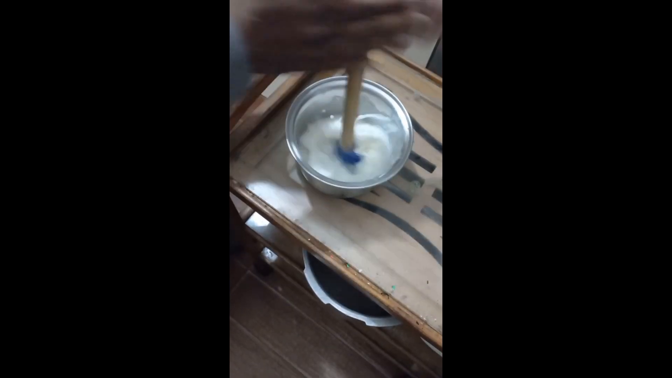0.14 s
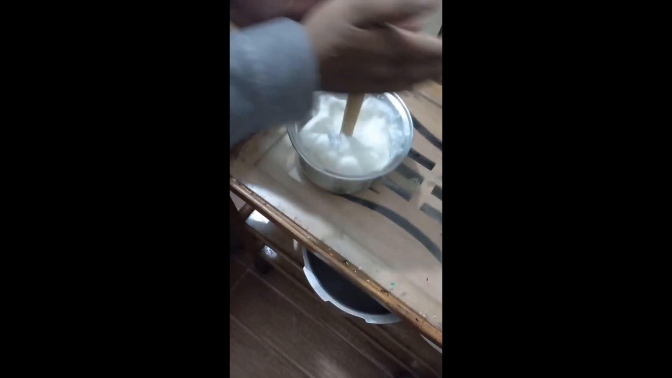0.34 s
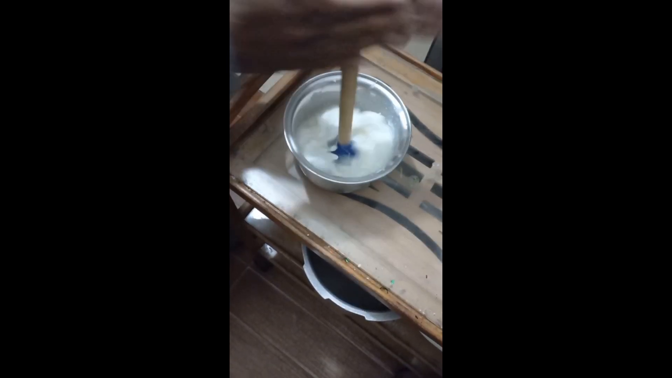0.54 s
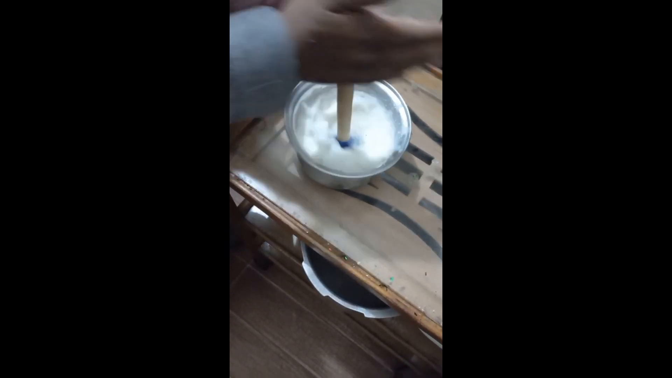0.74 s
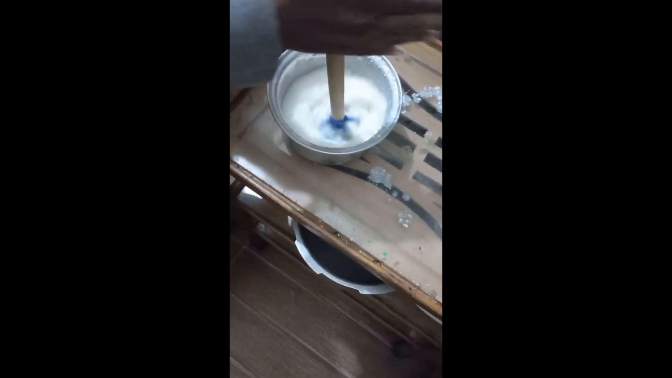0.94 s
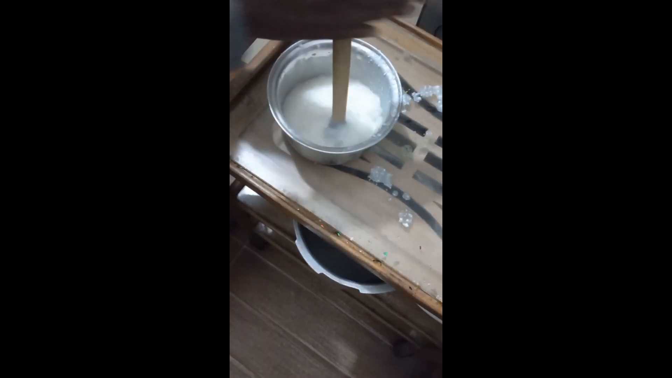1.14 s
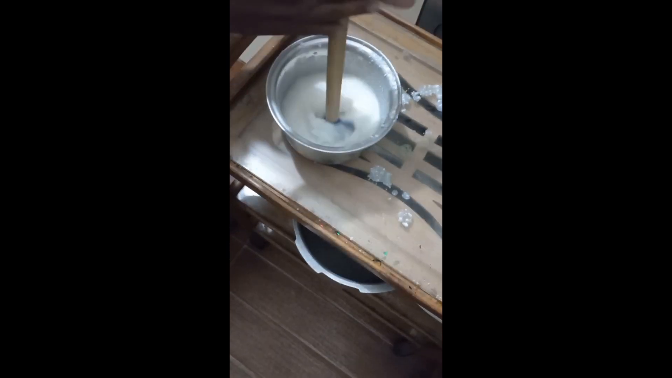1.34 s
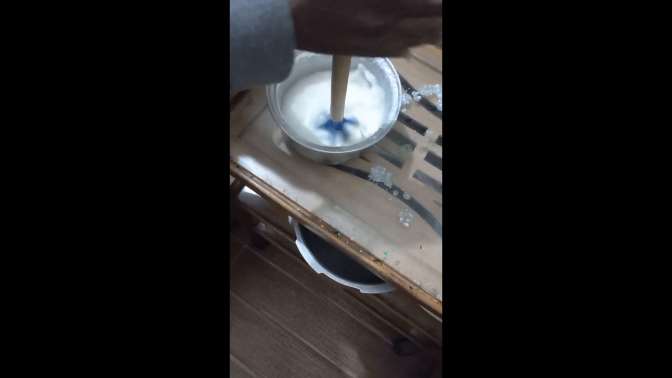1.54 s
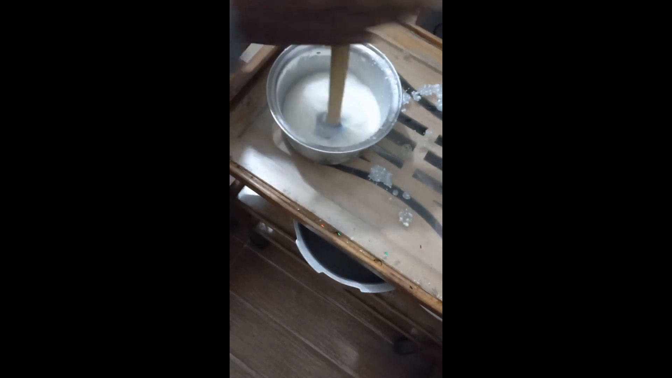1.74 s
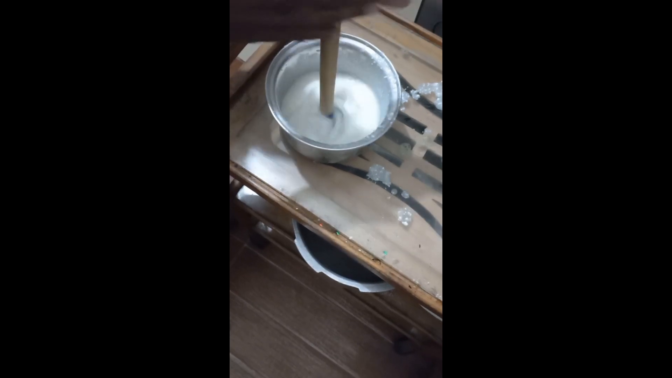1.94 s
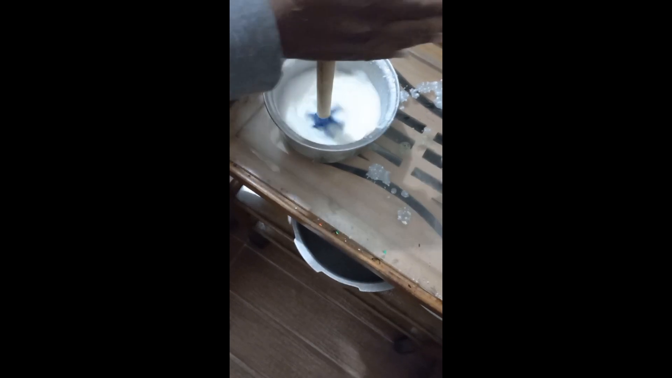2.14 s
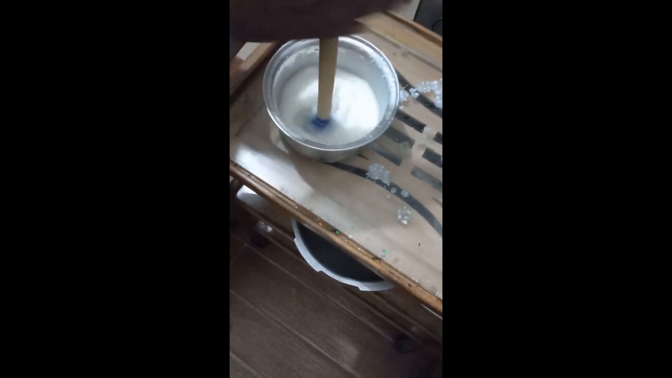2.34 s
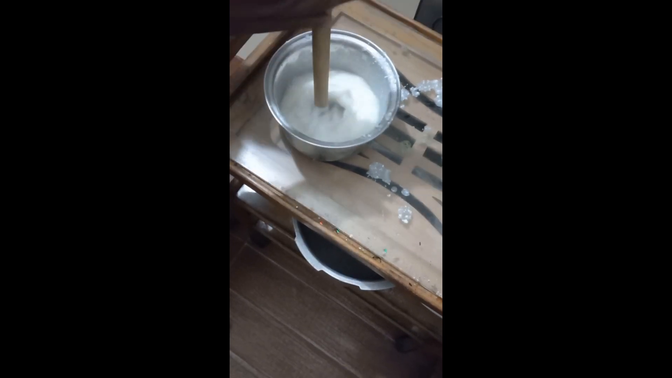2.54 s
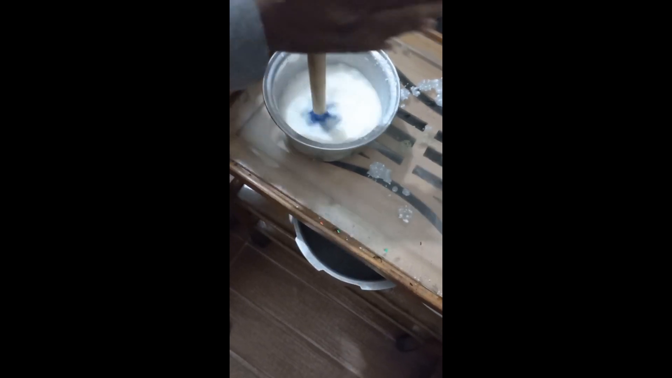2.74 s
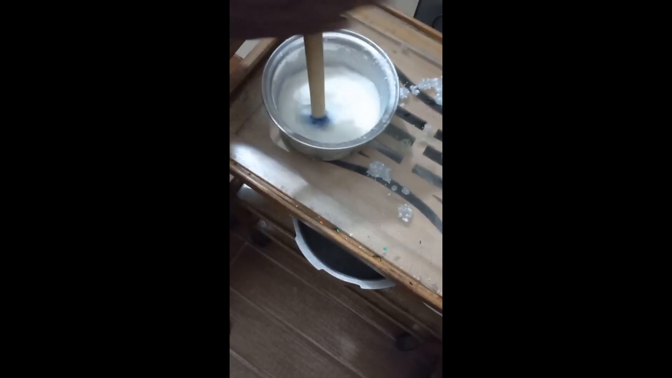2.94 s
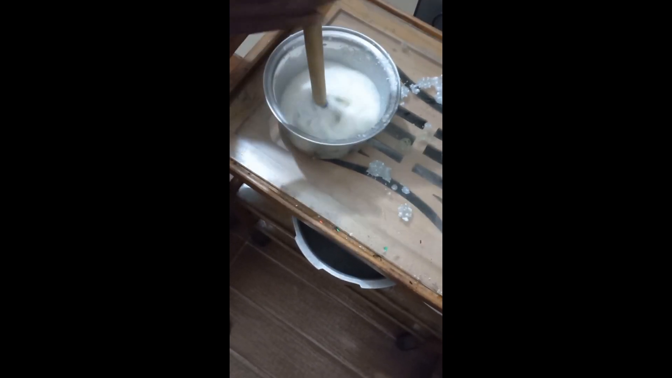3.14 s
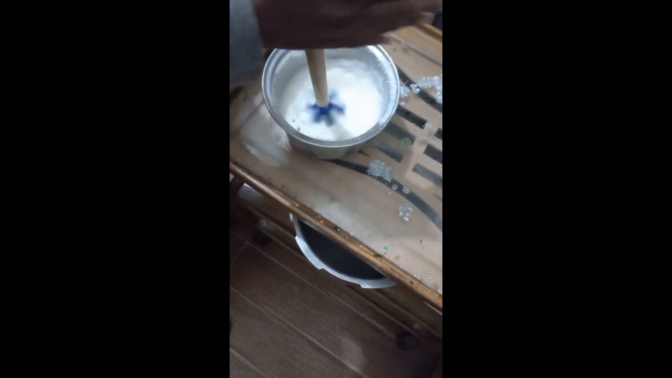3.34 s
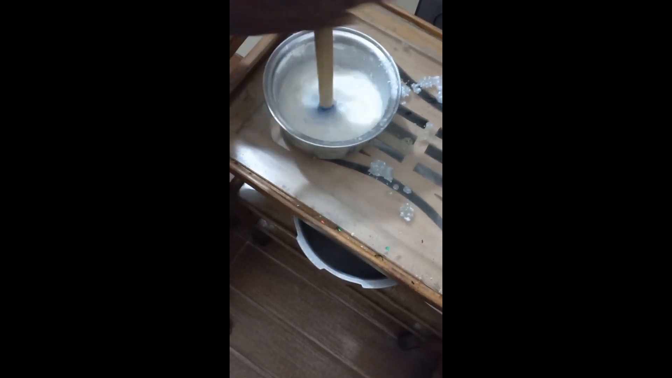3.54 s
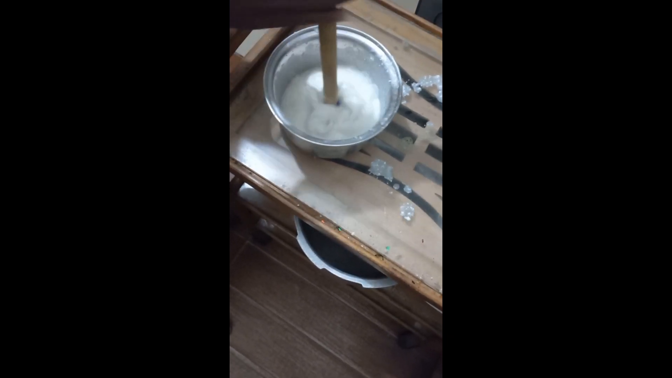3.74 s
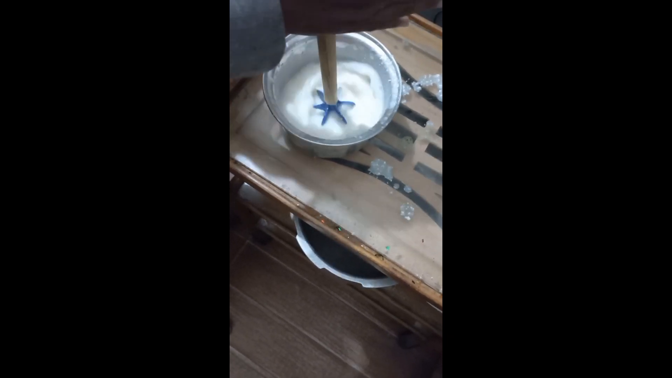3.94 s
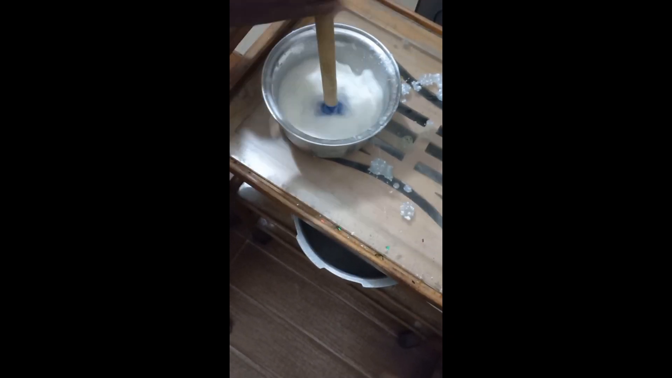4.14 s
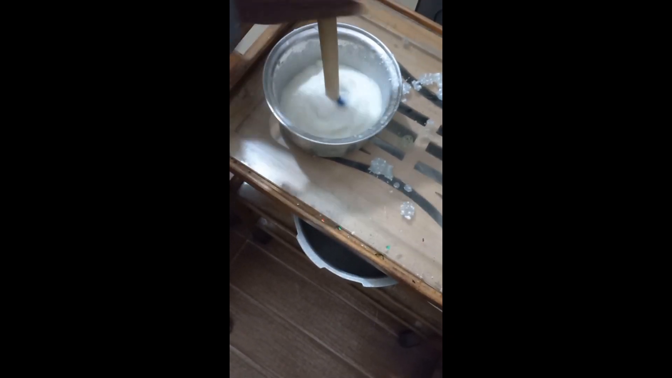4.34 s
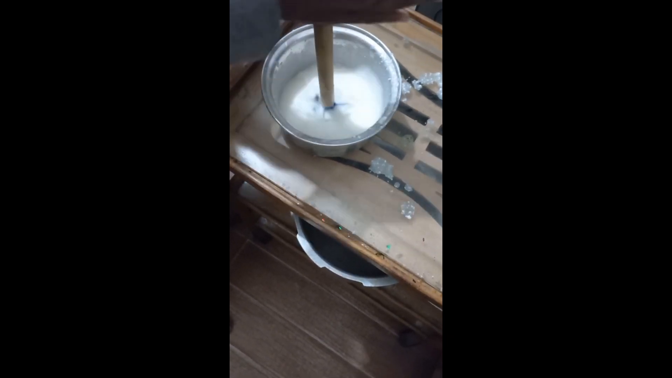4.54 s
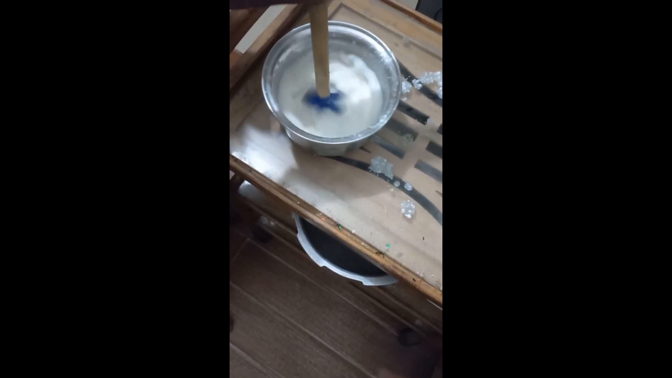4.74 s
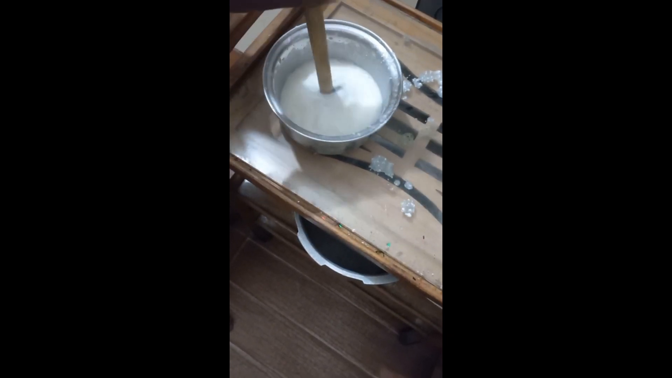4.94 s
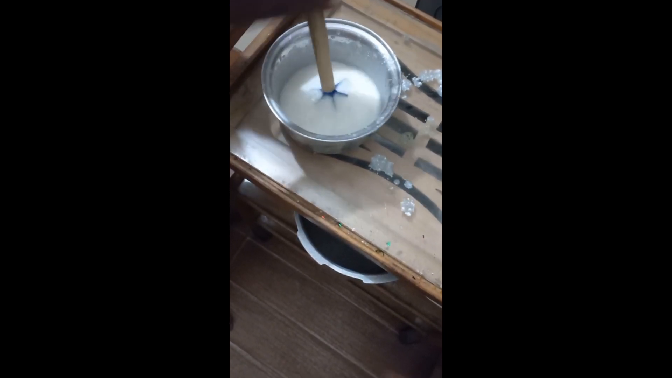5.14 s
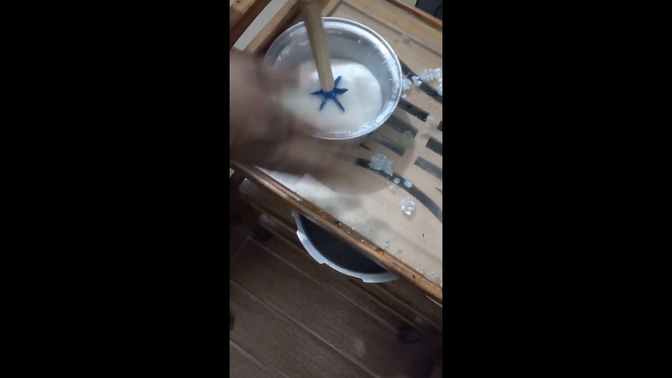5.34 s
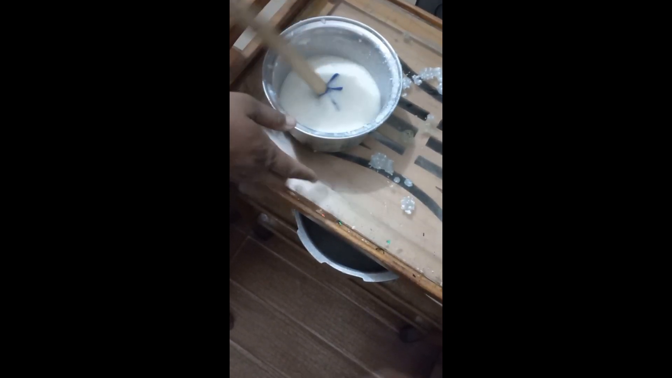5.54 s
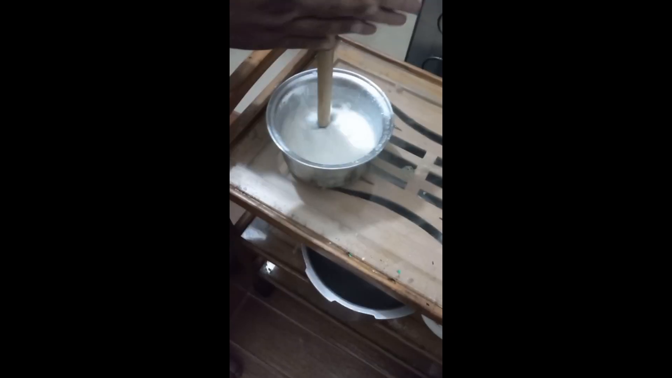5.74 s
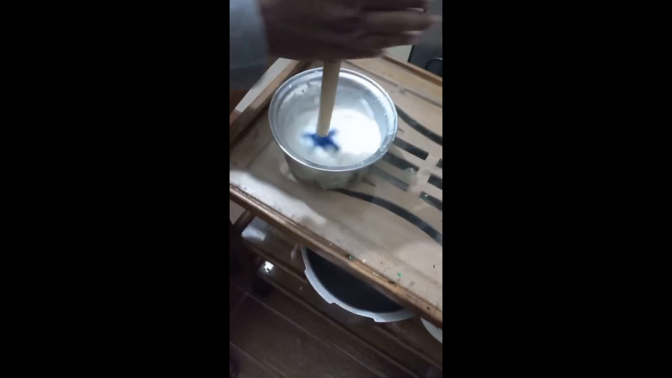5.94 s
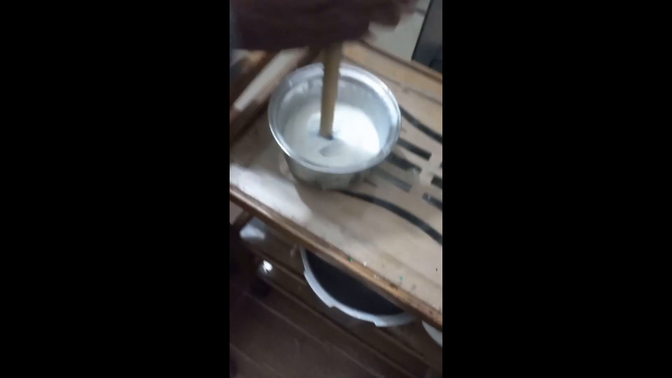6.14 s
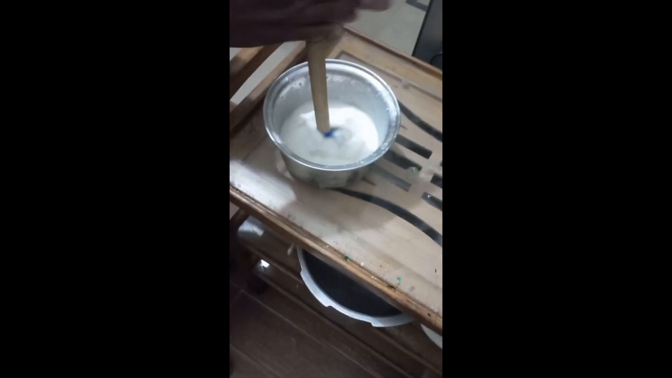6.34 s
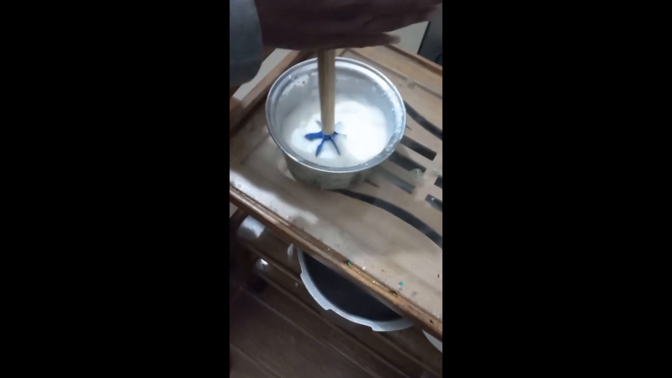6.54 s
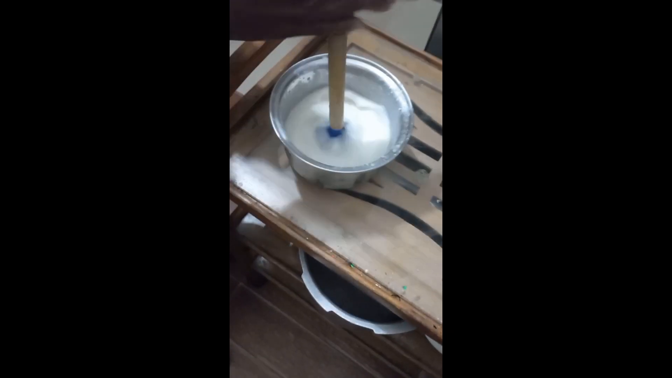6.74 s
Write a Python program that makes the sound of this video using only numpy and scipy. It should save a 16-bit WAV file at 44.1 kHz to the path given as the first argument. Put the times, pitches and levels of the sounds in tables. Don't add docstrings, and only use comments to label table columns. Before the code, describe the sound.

Wet churning in a metal pot: quick strokes of gurgle, splash and froth, a short rest with a skin squeak, then softer splashing.

```python
import sys
import numpy as np
from scipy import signal
from scipy.fft import rfft, irfft, next_fast_len
from scipy.io import wavfile
from scipy.ndimage import uniform_filter1d

SR = 44100
rng = np.random.default_rng(int(sys.argv[2]) if len(sys.argv) > 2 else 0)


def volts_from_db(level):
    exponent = np.asarray(level, float) / 20
    return 10 ** exponent


def store_pcm(level_fs):
    pcm = np.round(np.clip(level_fs, -1, 1) * 32767).astype(np.int16)
    wavfile.write(sys.argv[1], SR, np.atleast_2d(pcm).T)


N = 303849
FAST = next_fast_len(N)


def evened(x):
    return x / np.sqrt(np.mean(x ** 2) + 1e-20)


def smooth(x, size):
    return uniform_filter1d(uniform_filter1d(x, size), size)


def steadied(x):
    return x / np.sqrt(abs(uniform_filter1d((x ** 2).mean(0), size=5000)) + 1e-12)


def read(points, hz, column=1):
    rows = np.transpose(points)
    return np.interp(np.log(hz + 1), np.log(rows[0] + 1), rows[column])


def through(x, response):
    return irfft(rfft(x, FAST) * response(np.fft.rfftfreq(FAST, 1 / SR)), FAST)[..., :N]


def colour(x, points):
    return through(x, lambda hz: volts_from_db(read(points, hz)))


def ring(x, modes):
    return sum(volts_from_db(db) * signal.lfilter(*signal.iirpeak(hz, hz / width, SR), x) for hz, width, db in modes)


RIGHT_LAG_S = 7.5 / SR


def ports(x, share=1):
    return np.array([x, through(x, lambda hz: np.exp(-2j * np.pi * hz * share * RIGHT_LAG_S))])


# hz, level_db_per_hz
AIR = [(18, -76.5), (30, -38), (86, -36.5), (106, -20.5), (127, -19), (149, -19), (252, -11), (384, -50.5),
       (473, -40), (632, -46.5), (721, -57), (1500, -39), (2900, -42), (5450, -33), (16000, -48)]
AIR_DB = -75


def floor():
    air = np.array([colour(v, AIR) for v in rng.standard_normal((2, N))])
    high = signal.sosfilt(signal.butter(4, 600, "high", fs=SR, output="sos"), air)
    return air / np.sqrt(np.mean(high ** 2)) * volts_from_db(AIR_DB)


# hz, level_db, t60_s
ROOM = [(100, -30.5, 0.2), (302, -13, 0.53), (980, 1.5, 0.25), (3900, 1, 0.088), (14000, -1, 0.024)]


def kitchen(x, count=4):
    length = SR // 3
    taps = np.zeros((count, 2, length))
    slots = np.arange(40, length - 20, 20)
    at = slots + rng.integers(0, 20, (count, 2, len(slots)))
    np.put_along_axis(taps, at, rng.choice([-1., 1.], at.shape), 2)
    taps *= 1 - np.exp(-np.arange(length) / SR / 0.0079)
    hz, t, z = signal.stft(taps, SR, nperseg=512)
    t60_s = np.maximum(read(ROOM, hz, column=2), .02)[:, None]
    decay = volts_from_db(read(ROOM, hz)[:, None] - 60 * t / t60_s) / np.sqrt(t60_s)
    tails = signal.istft(z * decay, SR, nperseg=512)[1]
    energy = SR / 20 / (6 * np.log(10))
    turn = np.arange(N) / SR / .04 - np.arange(count)[:, None]
    share = np.cos(np.pi / 2 * np.clip((turn + count / 2) % count - count / 2, -1, 1))
    size = next_fast_len(N + tails.shape[-1])
    wet = rfft(x * share, size)[:, None] * rfft(tails / np.sqrt(energy), size)
    return irfft(wet.sum(0), size)[:, :N]


def board(modes, span):
    hum = ring(ring(rng.standard_normal(N), modes), span)
    return hum / np.sqrt(abs(smooth(hum ** 2, 3600)) + 1e-12)


# centre_s, low_board_db, upper_board_db, spread_s
PRESSES = [(.04, -45, -36, 0.11), (.2, -38.5, -57, 0.095), (.42, -32.5, -33, 0.091),
           (.62, -44, -41.5, 0.17), (1.09, -41, -38, 0.24), (1.61, -38, -37.5, 0.17),
           (1.84, -48, -39, 0.075), (2.17, -44, -44, 0.12), (2.4, -45.5, -39, 0.14),
           (2.8, -48, -43.5, 0.37), (3.28, -49.5, -45, 0.21), (3.53, -47, -36.5, 0.056),
           (3.8, -42, -38.5, 0.099), (4.17, -42.5, -35.5, 0.058), (4.47, -43, -43, 0.23),
           (4.78, -38.5, -39, 0.068), (5.08, -41, -40, 0.071), (5.32, -49, -53, 0.18),
           (5.723, -38, -36, 0.061), (5.92, -48, -41, 0.067), (6.2, -48.5, -47, 0.072),
           (6.54, -51, -48, 0.11), (6.81, -54, -50, 0.064)]
EASE_DB = 7


def pressure(column):
    t = np.arange(0, N / SR + .01, .005)
    rows = np.transpose(PRESSES)[..., None]
    power = volts_from_db(rows[column] - EASE_DB * abs((t - rows[0]) / rows[3]) ** 1.37) ** 2
    return np.interp(np.arange(N) / SR, t, np.sqrt(power.sum(0)))


# hz, width_hz, gain_db
LOW_BOARD = [(122.95, 2.65, 8), (143, 12.5, -1), (175, 26, -8.5), (78, 25, -12)]
UPPER_BOARD = [(247, 10, 8), (231.3, 2.1, -4.5), (272.6, 9.5, 0), (292.4, 5.6, -1.5), (403, 15, -6.5),
               (530, 7.7, 5.5)]


def table():
    low = board(LOW_BOARD, [(135, 107, 0)]) * pressure(column=1)
    upper = board(UPPER_BOARD, [(247, 90, 0)]) * pressure(column=2)
    return ports(low + upper)


# start_s, peak_db, pitch_hz, length_s
RINGS = [(0.171, -27.5, 541, 0.03), (0.356, -34, 3070, 0.025), (1.26, -34, 908, 0.041),
         (2.041, -27.5, 966, 0.038), (2.403, -28.5, 700, 0.024), (2.74, -35.5, 770, 0.035),
         (2.778, -46, 717, 0.037), (4.995, -53, 3380, .06), (5.139, -49.5, 530, 0.03),
         (5.81, -32.5, 700, 0.013), (6.36, -52, 694, .04), (6.401, -40.5, 700, 0.028)]


def rings():
    t, tone = np.arange(N) / SR, np.zeros(N)
    for s, db, hz, length in RINGS:
        since = t - s
        level_db = db - 156 * since.clip(0, 1) - 380 * (since - length).clip(0, 1)
        tone += volts_from_db(level_db) * (since / 0.0013).clip(0, 1) * np.sin(2 * np.pi * hz * since)
    return ports(tone, share=0.57)


def bubble(hz, t60, glide, chance):
    t = np.arange(int(t60 * SR) + 20) / SR
    tone = np.sin(2 * np.pi * (hz * t * (1 + glide * t / t60) + chance))
    return tone * volts_from_db(-60 * t / t60) * (1 - np.exp(-t * hz * 1.44))


def pops(rows, ring_s, glide, tick, spray=0.):
    out, chance = np.zeros((2, N + SR)), rng.random((len(rows), 3))
    noise, t = rng.standard_normal((len(rows), 1500)), np.arange(1500) / SR
    for (s, db, hz), (phase, rise, spot), crack in zip(rows, chance, noise):
        tone = bubble(hz, ring_s * (1000 / hz) ** 0.72, glide * rise, phase)
        mist = ring(crack, [(0.97 * min(hz, 12000), 0.36 * hz, 0)]) * np.exp(-t / 0.0044)
        puff = tick * crack * np.exp(-t / 0.00019) + spray * mist
        for port, lag in zip(out, (0, RIGHT_LAG_S + (spot - 1.2) * 5 / SR)):
            at = round((s + lag) * SR)
            port[at:at + len(tone)] += volts_from_db(db) * tone
            port[at:at + len(puff)] += volts_from_db(db) * puff
    return out[:, :N]


# start_s, peak_db, pitch_hz
THUMPS = [(1.455, -35, 366.6), (4.085, -31, 342), (4.342, -36.5, 334), (4.72, -34.5, 321),
          (4.95, -33.5, 247), (5.12, -33.5, 247), (5.7, -26, 243.2), (5.705, -36, 135)]


def thumps():
    return pops(THUMPS, 0.16, glide=0, tick=0)


# start_s, peak_db, pitch_hz
SQUEAK = [
    (4.993, -30.5, 3430),
    (5.072, -44, 3200),
    (5.1, -53, 3600),
]


def squeak():
    return pops(SQUEAK, 0.062, glide=.01, tick=.05)


# start_s, peak_db, centre_hz
TICKS = [(0.0932, -26, 14000), (0.167, -13, 13300), (0.2713, -27, 10900), (0.2838, -18, 13200),
         (0.4763, -32, 12200), (0.4873, -20, 10200), (0.5836, -26, 12800), (0.6983, -16, 10960),
         (0.7537, -10, 14100), (0.8415, -31, 12700), (0.8839, -36, 13700), (0.9033, -22, 12850),
         (0.9822, -26, 15500), (1.1563, -37, 13000), (1.1563, -31, 7380), (1.4361, -22, 13800),
         (1.7669, -31, 7420), (1.7749, -33, 7120), (1.9674, -28, 11300), (2.4269, -22, 14200),
         (2.6509, -32, 11300), (2.6778, -28, 7000), (2.7581, -25, 12200), (3.0415, -31, 7050),
         (3.2859, -21.5, 13700), (3.5548, -38, 12400), (3.5678, -26, 12100), (3.6052, -14, 7340),
         (3.8661, -24, 8780), (3.8985, -19.5, 11900), (4.1754, -12.5, 11000), (4.371, -30, 9600),
         (4.3969, -32, 10400), (4.4513, -31.5, 13900), (4.4937, -33, 14300), (4.9302, -42, 8890),
         (5.6067, -37, 13400), (5.6241, -25, 10300), (5.689, -26, 15400), (5.7109, -32, 14800),
         (5.7877, -33, 15300), (5.8775, -35, 13400), (6.0437, -48, 7110), (6.1394, -36, 13400),
         (6.2033, -29, 15200), (6.4892, -20.5, 13500), (6.554, -28, 11600), (6.6927, -30, 7150),
         (6.7446, -25, 14800), (6.785, -28, 12300), (6.8079, -24.5, 12500)]
# start_s, peak_db
FAINT_TICKS = [(0.3844, -34), (2.5137, -47), (3.473, -34), (3.4915, -39), (3.9564, -30), (4.5042, -32),
               (4.6, -37.5), (5.9678, -42), (6.106, -46), (6.2966, -40), (6.341, -37)]


def ticks():
    rows = [*TICKS, *((s, db, 8000) for s, db in FAINT_TICKS)]
    out, t = np.zeros((2, N + SR)), np.arange(900) / SR
    high = signal.butter(3, 5000, "high", fs=SR, output="sos")
    fall = np.exp(-t / 0.0011) + 0.11 * np.exp(-t / 0.003)
    for (s, db, hz), crack in zip(rows, rng.standard_normal((len(rows), 3, 900))):
        burst = signal.sosfilt(high, (crack[0] + 0.6 * crack[1:]) * fall)
        burst = 0.34 * burst + ring(burst, [(hz, 0.2 * hz, 0)])
        for port, lag, sound in zip(out, (0, RIGHT_LAG_S), burst / abs(burst).max()):
            at = round((s + lag) * SR)
            port[at:at + 900] += volts_from_db(db) * sound
    return volts_from_db(1.5) * out[:, :N]


# start_s, peak_db, centre_hz
DROPS = [(0.1355, -16, 2780), (0.2069, -15, 3600), (1.099, -25, 3640), (1.1483, -29, 4930),
         (1.322, -23.5, 3660), (1.4356, -26.5, 4960), (1.956, -32, 4640), (2.2977, -31, 5070),
         (2.3545, -17.5, 2960), (2.612, -37, 4610), (2.9203, -23, 3460), (3.0324, -32, 5680),
         (3.683, -23, 3700), (3.8087, -23.5, 5400), (4.14, -26, 3420), (4.1754, -24, 4700),
         (4.3849, -28, 3140), (4.449, -27, 4700), (5.0327, -51, 3320), (5.6241, -28, 3720),
         (5.7882, -20.5, 3200), (6.0237, -33, 5170), (6.246, -26, 4310), (6.6722, -34, 3360),
         (0.382, -26, 4300), (0.52, -21.5, 3500), (1.2562, -24, 2700), (1.287, -30, 6300),
         (1.455, -30, 6000), (1.71, -31, 5100), (2.97, -22, 2200), (3.255, -21, 3500), (3.277, -25, 2900),
         (3.7457, -30.5, 5400), (3.82, -30, 6200), (3.888, -37, 4800), (2.378, -15, 1690),
         (2.272, -31.5, 2400), (5.604, -26, 2730)]


def drops():
    return volts_from_db(2.5) * pops(DROPS, 0.018, glide=0.04, tick=0.15, spray=0.6)


# start_s, peak_db, centre_hz
SNAPS = [(0.166, -15.5, 5320), (0.1953, -18, 3350), (0.2848, -32, 5470), (0.3536, -22.5, 3070),
         (0.4863, -24.5, 6200), (0.5826, -23.5, 4830), (0.6998, -22, 5030), (0.902, -31, 3840),
         (0.9574, -27, 5730), (1.1576, -26, 4700), (1.7732, -22, 6250), (2.086, -27, 3640),
         (2.3285, -34, 3580), (2.376, -15.5, 3640), (2.6777, -18, 4960), (3.042, -23, 5500),
         (3.0701, -19, 5800), (3.2448, -24, 5750), (3.5014, -29.5, 4740), (3.5258, -20.5, 3600),
         (3.5776, -15, 4930), (3.6057, -22, 6000), (3.636, -35, 3120), (3.7738, -27, 4270),
         (3.8392, -30, 3240), (3.898, -22, 5370), (4.4952, -30, 4750),
         (5.5996, -31, 2840), (5.6233, -32, 3510), (5.691, -26.5, 6000), (5.878, -25.5, 4760),
                 (5.968, -34, 3900), (6.045, -38.5, 6650), (6.141, -37.5, 4000), (6.234, -28, 4270),
                 (6.457, -25, 3080), (6.551, -36, 3270), (6.684, -28.5, 3400), (6.745, -36, 5830),
                 (6.809, -28, 4500), (6.834, -27.5, 3900),
         (4.8628, -51, 4580), (4.9306, -54, 4870), (5.274, -51, 4200), (5.3921, -62.5, 5560)]


def snaps():
    return volts_from_db(6.5) * pops(SNAPS, 0.024, glide=0.035, tick=0.12, spray=0.64)


# start_s, peak_db, pitch_hz
SLAPS = [
    (0.169, -8, 1160),
    (0.583, -5, 1460),
    (3.502, -11, 1870),
    (4.098, -26, 920),
    (5.594, -13.5, 2113),
]


def slaps():
    return volts_from_db(-10.0) * pops(SLAPS, 0.015, glide=.1, tick=0.19, spray=0.23)


# start_s, peak_db,
# pitch_hz
GLUGS = [(0.477, -19.5, 700), (0.585, -18, 600), (0.705, -33, 487), (0.853, -18.5, 503), (1.097, -23, 540),
         (1.148, -24.5, 424), (1.21, -23, 620), (1.503, -28, 503), (1.701, -27, 550), (2.389, -25, 513),
         (2.448, -19, 662), (2.919, -33, 530), (3.167, -28, 710), (3.513, -20.5, 565), (3.636, -22.5, 813),
         (3.79, -23.5, 505), (4.062, -29.5, 540), (4.098, -23, 625), (4.163, -18, 537), (4.408, -30.5, 700),
         (4.688, -29.5, 553), (4.724, -24, 509),
         (0.224, -21, 740), (2.304, -27, 341), (2.854, -32, 585), (3.193, -31, 410), (4.134, -22, 586),
         (4.199, -29, 560), (4.265, -27.5, 790), (4.299, -35, 627), (4.609, -37, 586), (4.744, -27, 512),
         (4.779, -26.5, 614), (4.809, -34.5, 355), (6.114, -40, 563), (6.486, -29.5, 692)]


def glugs():
    return volts_from_db(0.5) * pops(GLUGS, 0.038, glide=0.096, tick=.03)


# start_s, peak_db, pitch_hz
BEADS = [(0.14, -16.5, 1540), (0.701, -16, 1245), (0.854, -22, 1190), (1.097, -26.5, 880),
         (1.782, -21.5, 916), (1.822, -27, 1220), (1.991, -27, 1040), (2.301, -28, 995),
         (2.377, -16.5, 950), (2.711, -21.5, 926), (2.873, -24, 1014), (2.958, -23.5, 1180),
         (3.239, -18.5, 1380), (3.704, -25, 1010), (3.753, -23.5, 1010), (3.892, -31, 1530),
         (4.298, -23.5, 1430), (4.639, -26, 1170), (4.689, -18, 1590), (4.931, -38, 1580),
         (4.998, -40, 1606), (5.603, -28, 2200), (5.626, -22, 1720), (5.638, -26.5, 1260),
         (5.664, -33, 1800), (5.748, -31, 1610), (5.89, -25, 1500), (5.937, -32, 1310), (5.984, -29, 1406),
         (6.124, -39, 1450), (6.157, -31.5, 1010), (6.175, -26.5, 1340), (6.204, -25.5, 1330),
         (6.22, -35, 1180), (6.552, -26, 1360), (6.744, -20.5, 1300)]


def beads():
    return volts_from_db(1.5) * pops(BEADS, 0.029, glide=0.092, tick=0.02, spray=0.54)


# start_s, peak_db, pitch_hz
PLOPS = [(0.0878, -17, 1380), (0.1986, -19, 905), (0.3536, -17.5, 980), (0.4676, -14, 1600),
         (0.4908, -20, 1090), (0.5823, -16, 1445), (0.6616, -21.5, 940), (0.7146, -15, 1330),
         (0.7487, -25.5, 1380), (1.163, -12.5, 2100), (1.513, -18.5, 1050), (1.7037, -21, 1470),
         (1.7823, -24, 824), (1.8627, -21, 1930), (2.0321, -18.5, 956), (2.0852, -11, 1867),
         (2.5606, -24.5, 1575), (2.6794, -19, 1550), (2.8828, -22, 1090), (2.8963, -19.5, 1410),
         (3.2283, -20, 1380), (3.4995, -27, 1844), (3.5289, -21, 1147), (3.566, -26, 1700),
         (3.629, -21.5, 1200), (3.908, -12.5, 1566), (4.0622, -27.5, 1080), (4.1301, -19.5, 1360),
         (4.328, -24.5, 1380), (4.3859, -19.5, 2160),
         (5.5951, -23, 2140), (5.79, -19.5, 2660), (6.205, -32, 2380), (6.243, -30, 2280),
                 (6.4155, -27.5, 2060), (6.4843, -17, 1650), (6.687, -28.5, 2260), (6.722, -24, 1490),
                 (6.784, -20, 1650)]


def plops():
    return volts_from_db(3.0) * pops(PLOPS, 0.027, glide=0.24, tick=0.06, spray=0.62)


def grains(lo_hz, hi_hz, cycles, per_s, spread_db, largest, count=28):
    size = volts_from_db(spread_db * np.minimum(rng.exponential(1, N), largest))
    size *= rng.random(N) < per_s / SR
    kind, chance, out = rng.integers(0, count, N), rng.random((count, 2)), np.zeros(N + SR)
    for k, hz in enumerate(np.geomspace(lo_hz, hi_hz, count)):
        shape = bubble(hz, cycles * (.5 + chance[k, 0]) / hz, 0.807 * chance[k, 1], 0)
        shape = shape / np.linalg.norm(shape) * np.sqrt(hz)
        for at in np.flatnonzero(size * (kind == k)):
            out[at:at + len(shape)] += size[at] * shape
    return ports(evened(out[:N]))


def lumps(seconds):
    return evened(smooth(rng.standard_normal(N), max(int(seconds * SR), 2)))


def wash(seconds, patchy_db, clump_db, apart):
    same, own = ports(rng.standard_normal(N)), rng.standard_normal((2, N))
    mixed = np.sqrt(1 - apart) * same + np.sqrt(apart) * own
    z = signal.stft(mixed, nperseg=256, noverlap=128)[2]
    clumps = uniform_filter1d(rng.standard_normal(z.shape[1:]), size=3, axis=0)
    z = z * volts_from_db(clump_db * evened(uniform_filter1d(clumps, size=8, axis=1)))
    clumped = signal.istft(z, nperseg=256, noverlap=128)[1][:, :N]
    return evened(clumped * volts_from_db(patchy_db * lumps(seconds)))


# start_s, crest_after_s, strength_db, gurgle_over_slosh_db, foam_over_slosh_db
STROKES = [(-.1, 0.042, -25.5, -11.5, -6), (0.159, 0.0042, -28.5, -11.5, -3),
           (0.249, 0.071, -29.5, -12, -10.5), (.43, 0.092, -31.5, -5, -4), (.65, 0.049, -28.5, -2, -6),
           (0.819, 0.053, -33.5, -6.5, -7.5), (1.086, .12, -33.5, 0, -7), (1.389, 0.082, -33.5, -4, -11.5),
           (1.658, .11, -32, -6.5, -9.5), (1.959, 0.098, -33.5, -8, -9.5), (2.27, 0.088, -30, -7.5, -11.5),
           (2.552, 0.13, -35.5, -8.5, -12), (2.858, 0.13, -38, -3.5, -3), (3.151, 0.11, -34, -11, -9.5),
           (3.487, 0.084, -29.5, -7.5, -10), (3.735, 0.12, -33.5, -7, -7.5), (4.046, 0.082, -33.5, 0.5, -8),
           (4.28, 0.17, -36, -5.5, -10), (4.594, 0.1, -37, -4.5, -7), (5.593, 0.024, -39, -12.5, -2.5),
           (5.78, 0.089, -46.5, -4, -5), (6.13, 0.097, -37.5, -12.5, -11), (6.379, 0.088, -36, -16, -12),
           (6.662, 0.081, -36, -12, -9)]
# crest_share, rise_db, hold_s, fall_db_per_s, settle_db, settle_db_per_s
FOLLOW = [
    (.45, 5, 0.071, 82.5, -25, 42),
    (.9, 11, 0.043, 129.5, -19, 33.5),
    (1.15, 11, 0.024, 114, -15.5, 39),
]
LAG = (0.06, 0.085, 0.42)


def stroke(layer):
    share, rise_db, hold_s, fall, settle_db, settle = FOLLOW[layer]
    t = np.arange(0, N / SR + .01, .001)
    start, crest_s, db, depth_db, foam_db = np.transpose(STROKES)[..., None]
    past = t - start - share * crest_s
    late = np.maximum(past - hold_s, 0)
    fade_in = np.clip((t - start) / (LAG[layer] * crest_s + 0.003), 0, 1) ** 2
    swell = volts_from_db(rise_db * np.minimum(past / (share * crest_s), 0)) * fade_in
    power = swell ** 2 * (volts_from_db(-fall * late) ** 2 + volts_from_db(settle_db - settle * late) ** 2)
    power *= volts_from_db(db + (depth_db, 0, foam_db)[layer]) ** 2
    return np.interp(np.arange(N) / SR, t, np.sqrt(power.sum(0)))


# start_s, length_s, level_db
FIZZ = [(1.436, 0.52, -50.5), (2.6, 0.21, -49), (0.43, 0.15, -44.5), (4.36, 0.11, -56),
        (5.274, 0.089, -69.5), (4.9, 0.31, -75), (4.176, 0.073, -41), (2.4, 0.075, -44)]


def fizz():
    t = np.arange(N) / SR
    return sum(volts_from_db(db) * (t > s) * np.clip((s + length - t) / 0.066, 0, 1) for s, length, db in FIZZ)


# hz, level_db_per_hz
FROTH = [(1290, -37.5), (2200, 1), (2820, -1.5), (3590, -2.5), (4350, -6), (4840, -4), (5810, -4),
         (8240, -17.5), (10500, -13.5), (13800, -11), (15200, -12), (16000, -34)]
# hz, gain_db
FIZZ_TILT = [(3000, -4.5), (8000, 1.5), (13500, 2.5)]


def froth():
    hiss = wash(0.0019, patchy_db=4.5, clump_db=3.5, apart=1.0)
    crackle = grains(2770, 17000, cycles=5.5, per_s=630, spread_db=4.5, largest=2.45)
    foam = evened(colour(0.92 * hiss + 0.28 * crackle, FROTH))
    standing = steadied(colour(foam[:, ::-1], FIZZ_TILT))
    return (foam * stroke(layer=2) + standing * fizz()) * volts_from_db(3.5)


HOLLOW_HZ, CLIMB_PER_S, HOLLOW_TOP_HZ, HOLLOW_WIDTH_HZ = 600, 13, 2570, 450


def hollow(x):
    t, starts = np.arange(N) / SR, np.transpose(STROKES)[0]
    since = t - starts[np.searchsorted(starts, t) - 1]
    hz = np.minimum(HOLLOW_HZ * np.exp(CLIMB_PER_S * since), HOLLOW_TOP_HZ)
    turn = np.exp(2j * np.pi * np.cumsum(hz) / SR)
    r = np.exp(-np.pi * HOLLOW_WIDTH_HZ / SR)
    return 2 * (turn * signal.lfilter([1 - r], [1, -r], x / turn)).real


# hz, level_db_per_hz
GURGLE = [(180, -24), (310, 1), (450, 1), (750, 0), (950, -2.5), (1500, -22.5)]
# hz, level_db_per_hz
SLOSH = [(500, -26.5), (800, 1.5), (1000, -4), (1600, 2), (2500, -5), (4000, -13.5), (6500, -19)]
# hz, width_hz, gain_db
POT = [(543, 23, -1.5), (700, 20, -3.5), (763, 7.5, 0.5), (966, 74, -2.5), (1380, 91, -18.5),
       (1650, 110, -30), (2440, 920, -23)]


def slosh():
    deep = 0.83 * wash(0.063, patchy_db=-7.5, clump_db=1.5, apart=0.59)
    deep += 0.33 * grains(328, 980, cycles=25.8, per_s=170, spread_db=4.0, largest=3.0)
    bright = 0.45 * wash(0.014, patchy_db=5.5, clump_db=3.0, apart=0.72)
    bright += 0.39 * grains(922, 4820, cycles=20.6, per_s=450, spread_db=6.0, largest=2.22)
    deep, bright = colour(deep, GURGLE), colour(bright, SLOSH)
    deep = steadied(0.63 * deep + ring(deep, POT))
    bright = steadied(0.84 * bright + ring(bright, POT) + 0.29 * hollow(bright))
    return (deep * stroke(layer=0) + bright * stroke(layer=1)) * volts_from_db(-0.5)


def scene():
    near = table() + rings() + thumps() + squeak()
    near += ticks() + drops() + snaps() + slaps()
    near += glugs() + beads() + plops()
    near += froth() + slosh()
    return floor() + kitchen(near[0]) + near


DUCK_S, DUCK_DB, RECOVER_S = .774, -15, 0.06


def gain_control(x):
    since = np.arange(N) / SR - DUCK_S
    return x * volts_from_db(DUCK_DB * (since > 0) * np.exp(-(since / RECOVER_S) ** 2))


# hz, left_over_right_db
LEFT_OVER_RIGHT = [(100, 2), (380, 2), (700, 2.5), (1290, 0.5), (2380, 2), (4400, -2), (8120, 2.5),
                   (15000, 4.5)]
# hz, gain_db
MICROPHONE = [(20, -1), (60, -7), (100, -0.5), (8000, -0.5)]
# hz, gain_db
EDGE = [(15750, 0), (15950, -55)]


def microphones(x):
    side = np.array([[.5], [-.5]])
    return through(x, lambda hz: volts_from_db(side * read(LEFT_OVER_RIGHT, hz) + read(MICROPHONE, hz) + read(EDGE, hz)))


def roll_off(x):
    return signal.sosfilt(signal.butter(12, 17000, fs=SR, output="sos"), x)


def record(dry):
    return roll_off(microphones(gain_control(dry)))


dry = scene()
out = record(dry)
store_pcm(out)
```